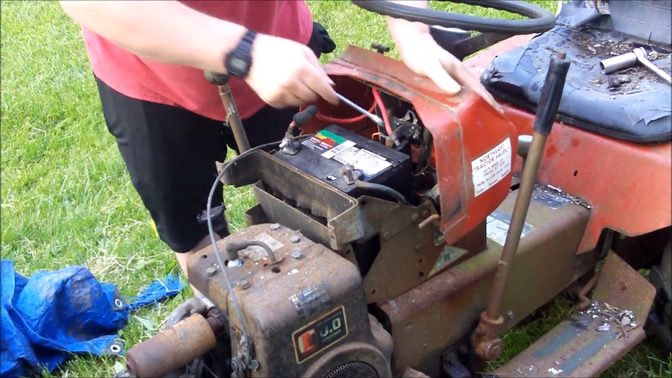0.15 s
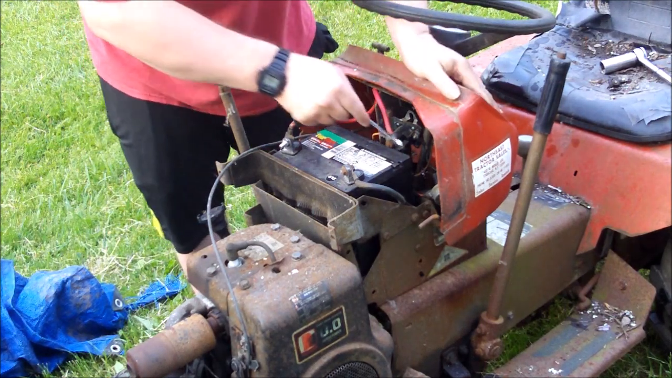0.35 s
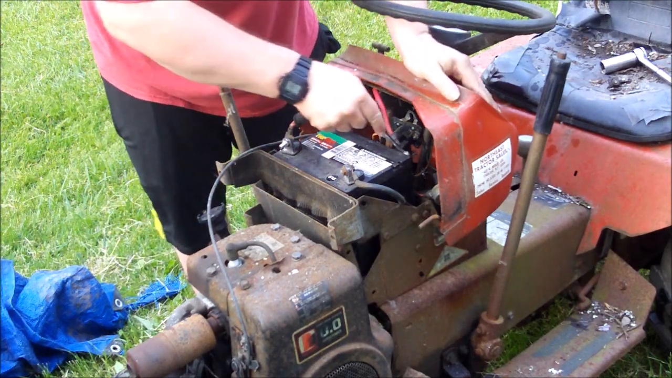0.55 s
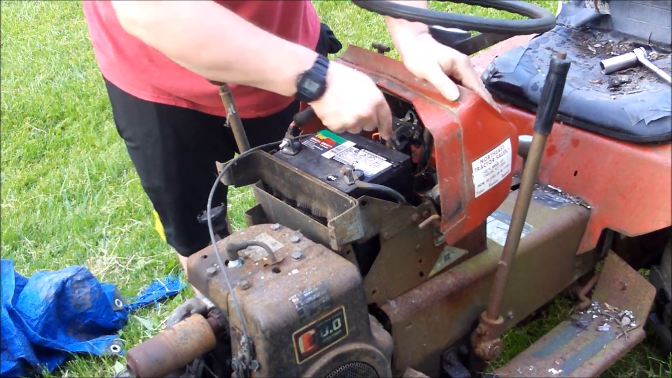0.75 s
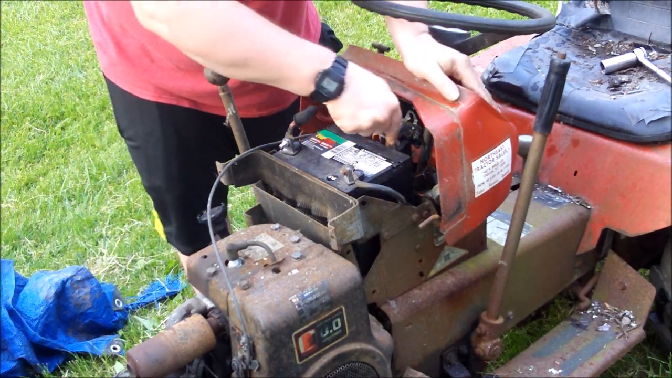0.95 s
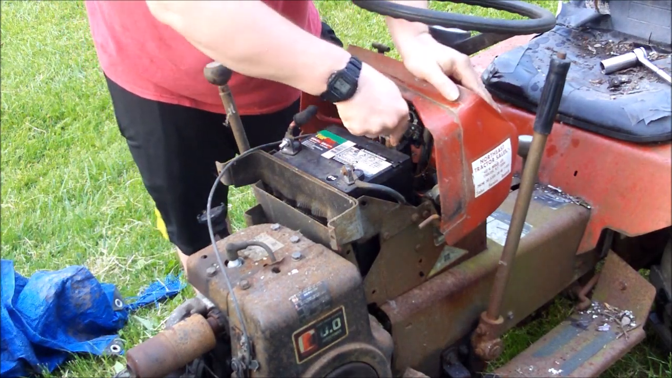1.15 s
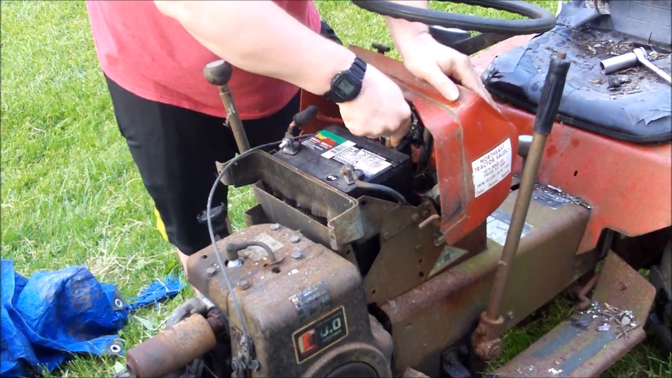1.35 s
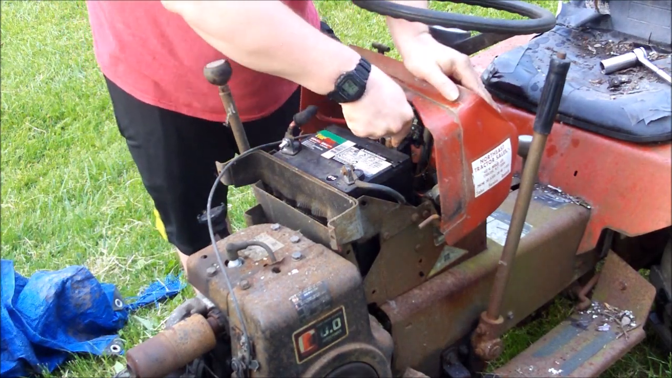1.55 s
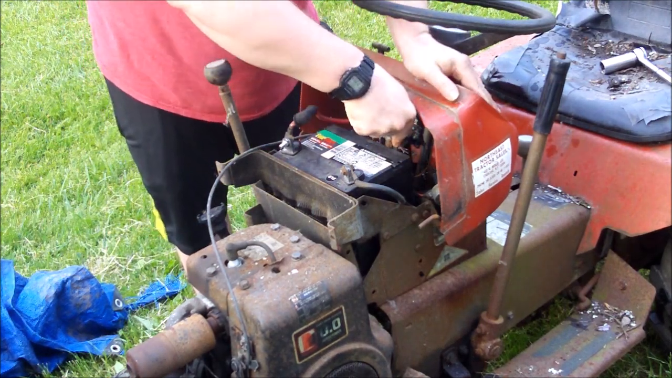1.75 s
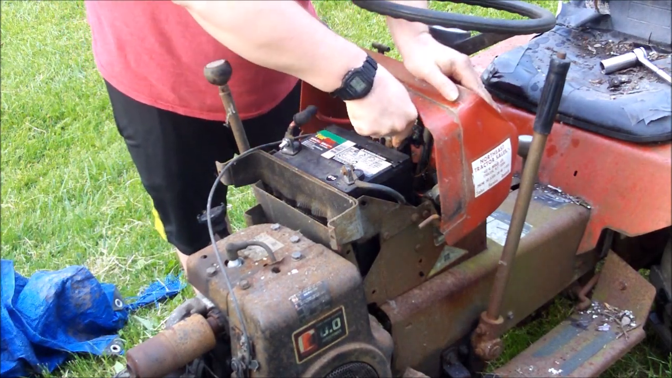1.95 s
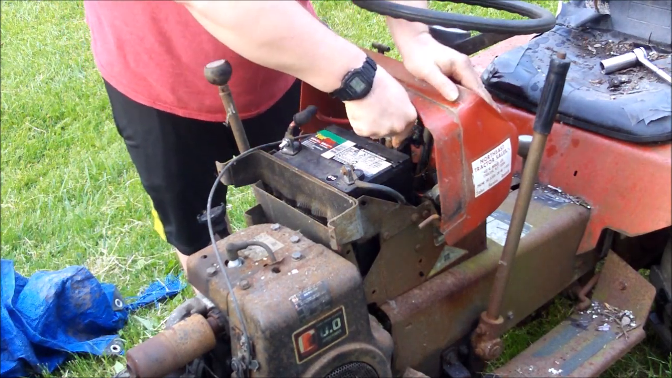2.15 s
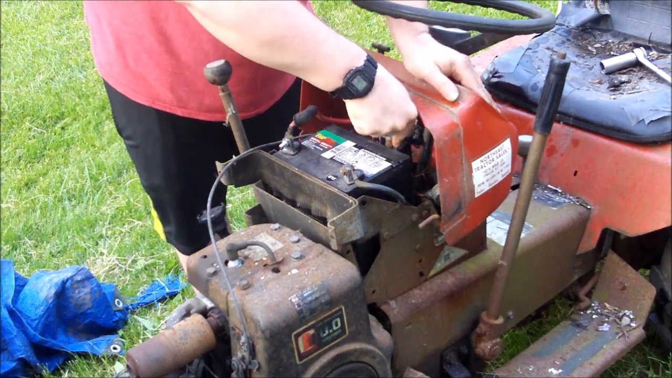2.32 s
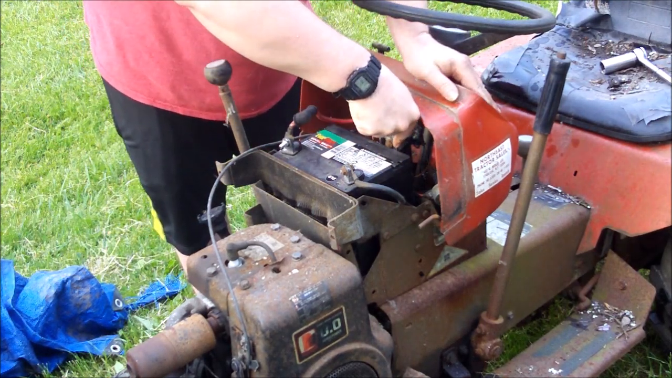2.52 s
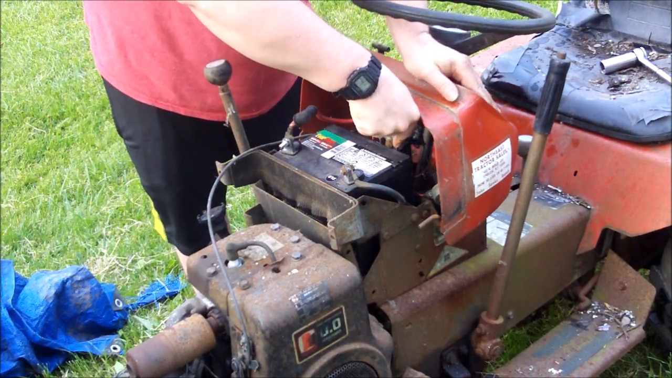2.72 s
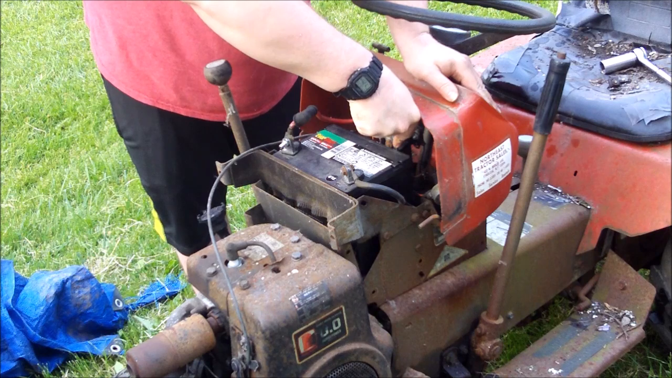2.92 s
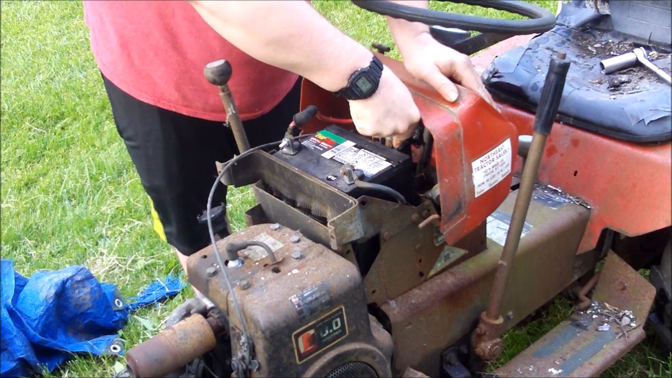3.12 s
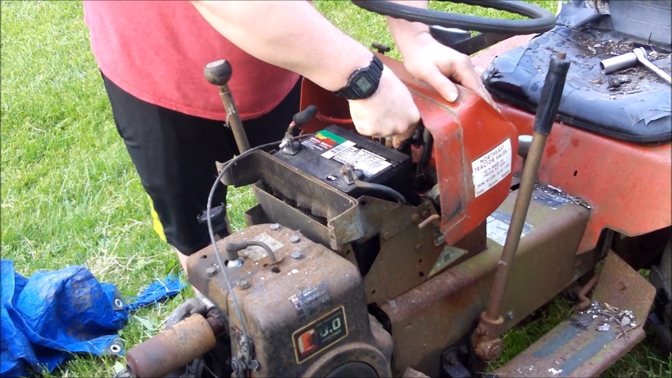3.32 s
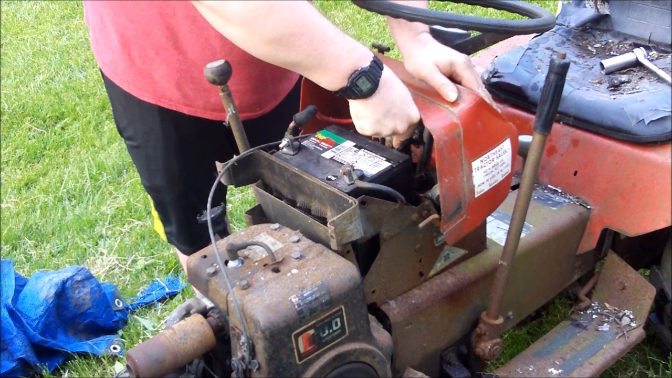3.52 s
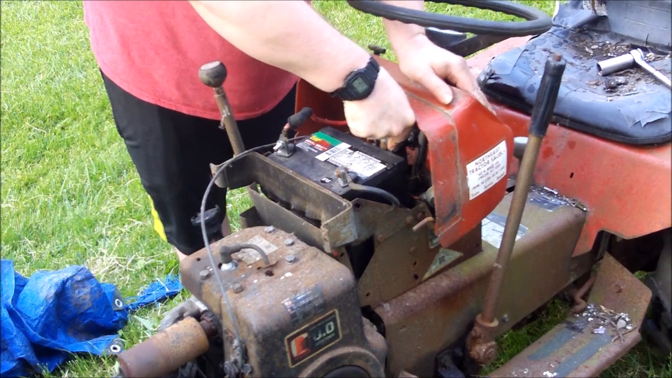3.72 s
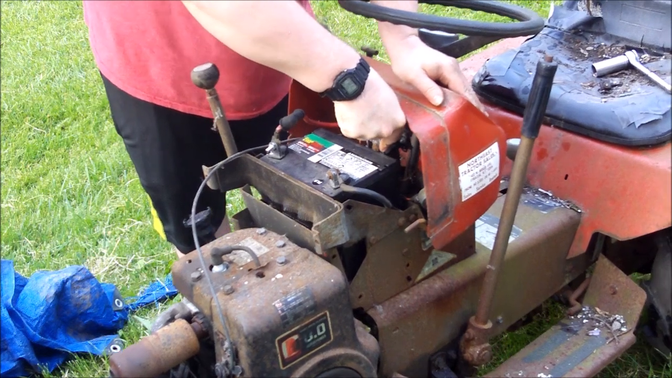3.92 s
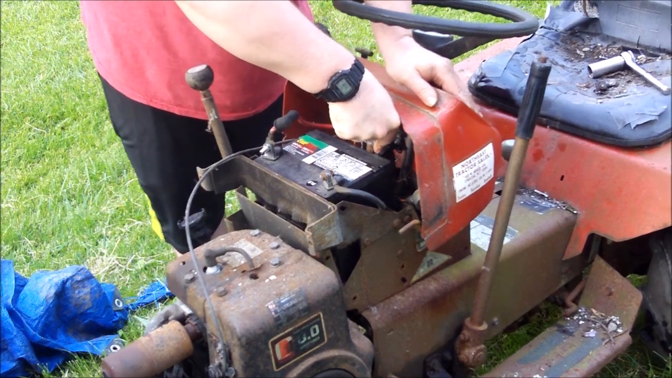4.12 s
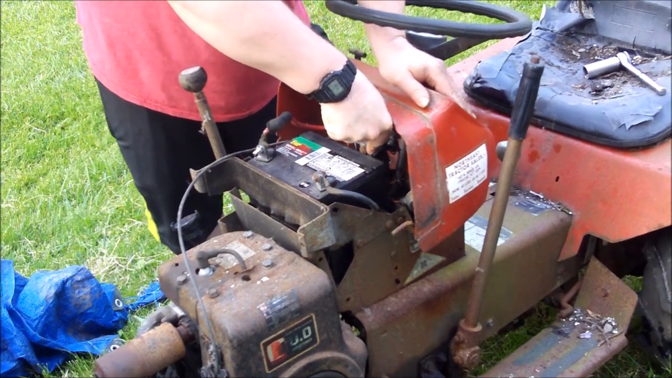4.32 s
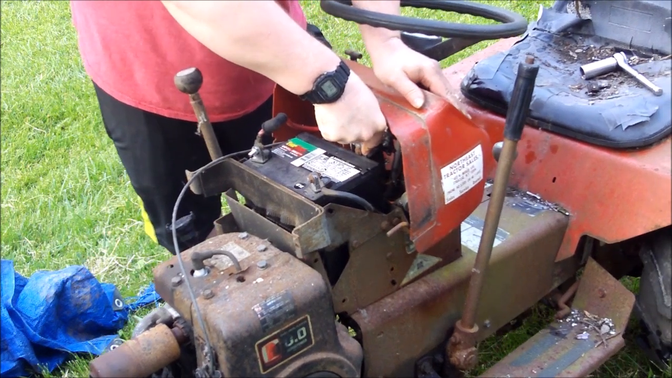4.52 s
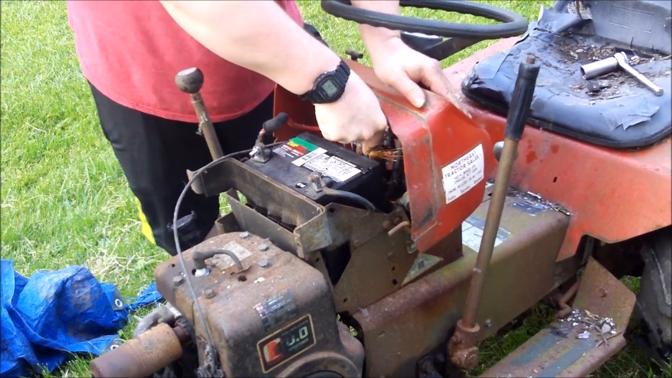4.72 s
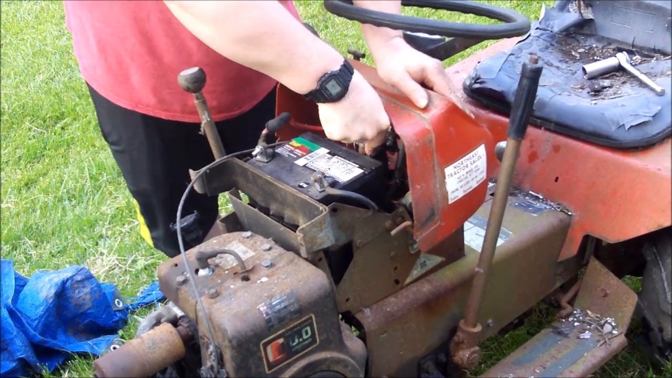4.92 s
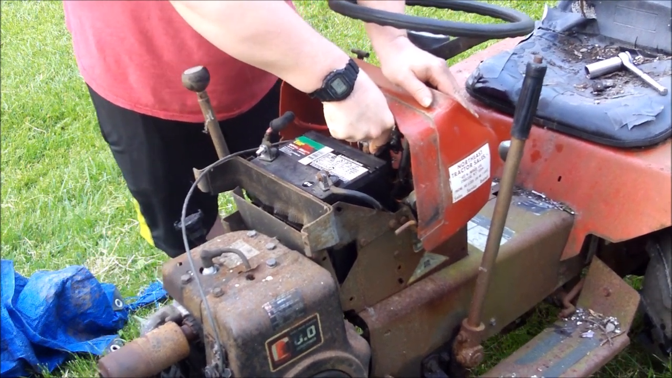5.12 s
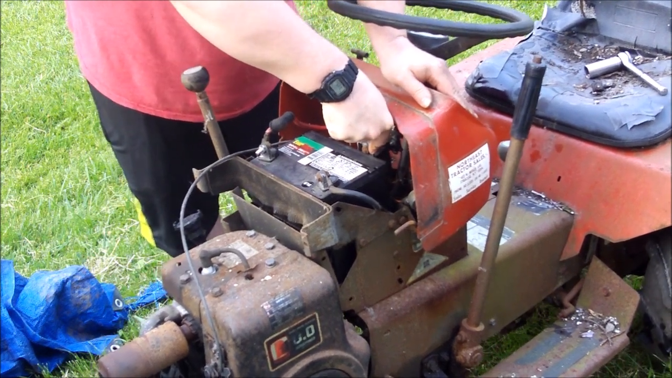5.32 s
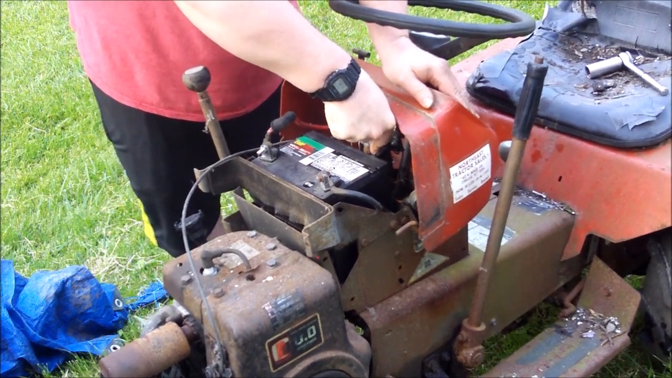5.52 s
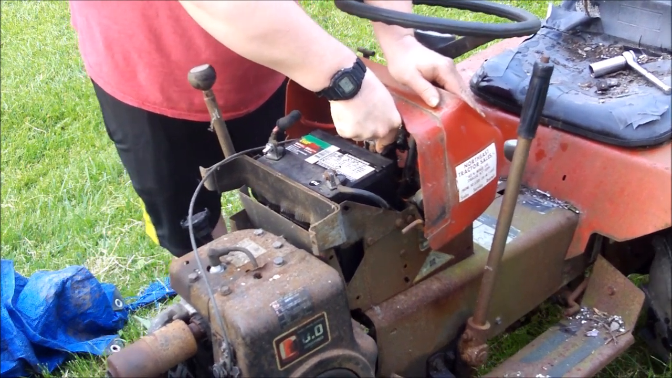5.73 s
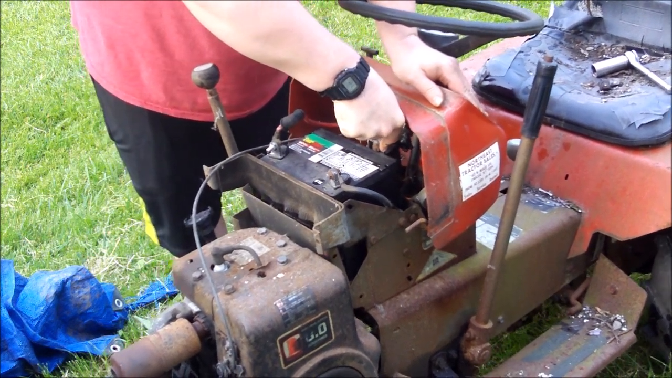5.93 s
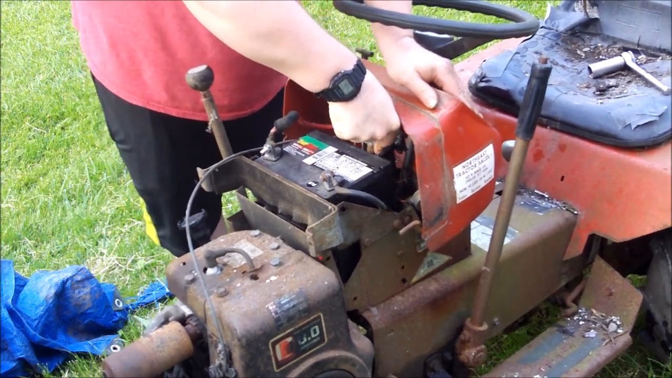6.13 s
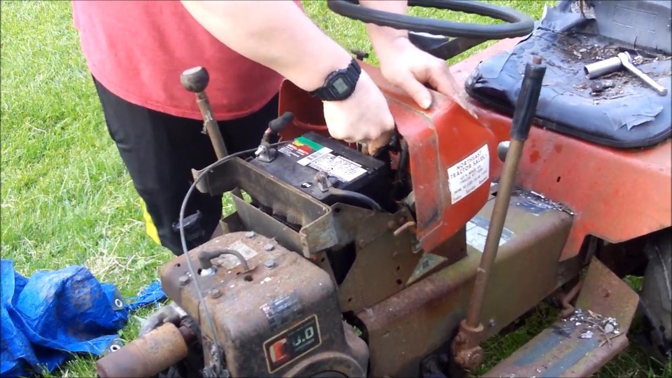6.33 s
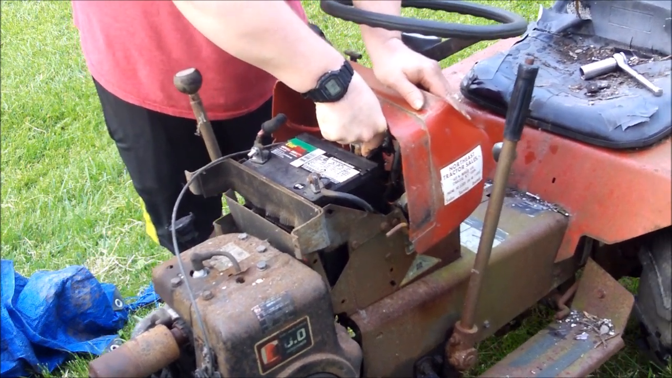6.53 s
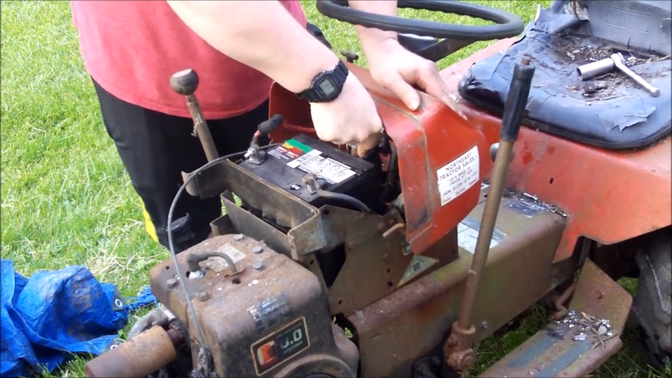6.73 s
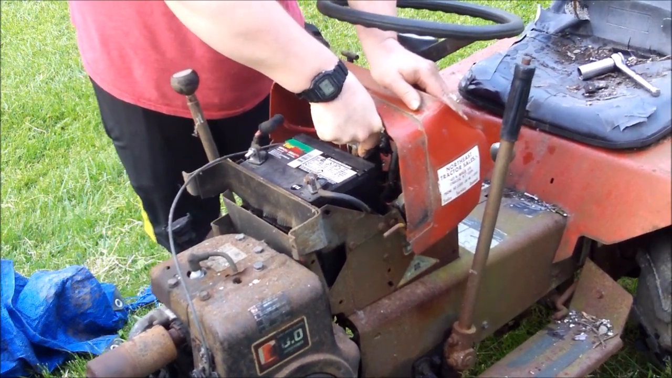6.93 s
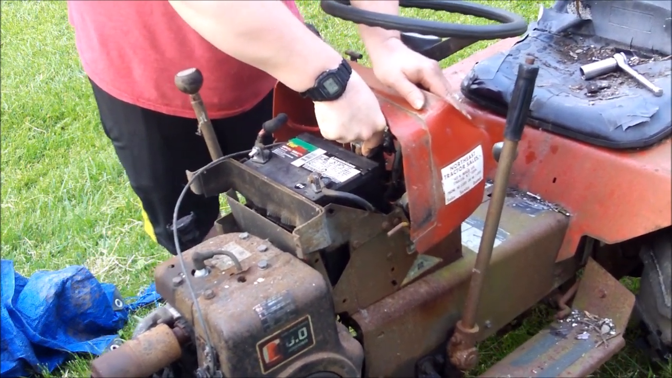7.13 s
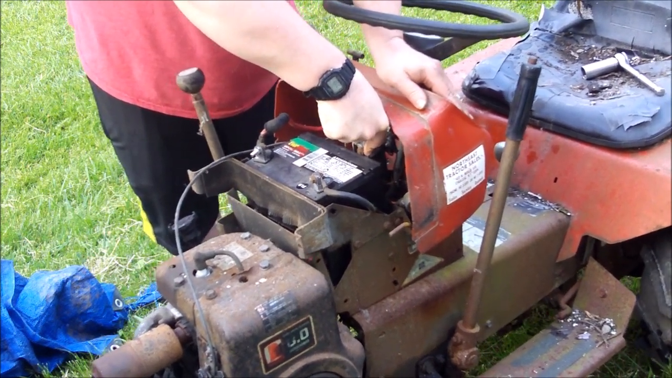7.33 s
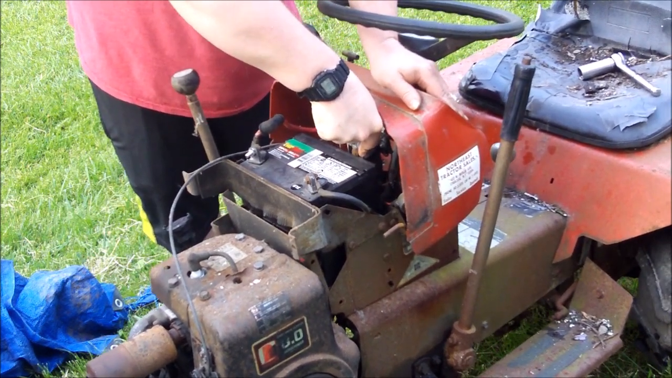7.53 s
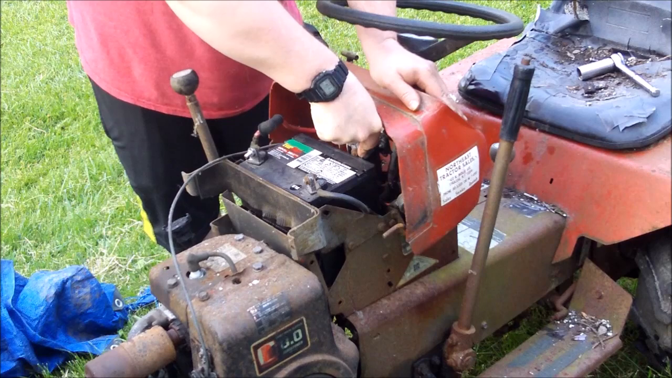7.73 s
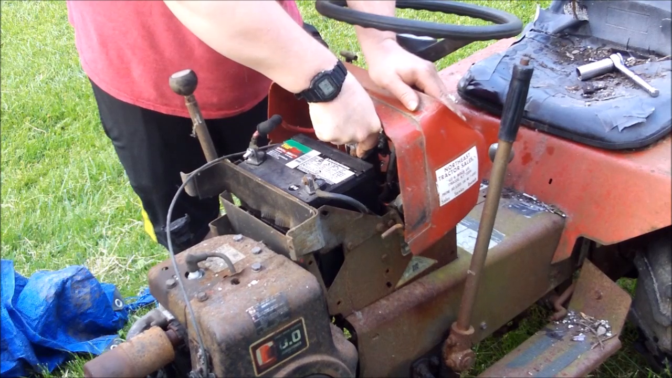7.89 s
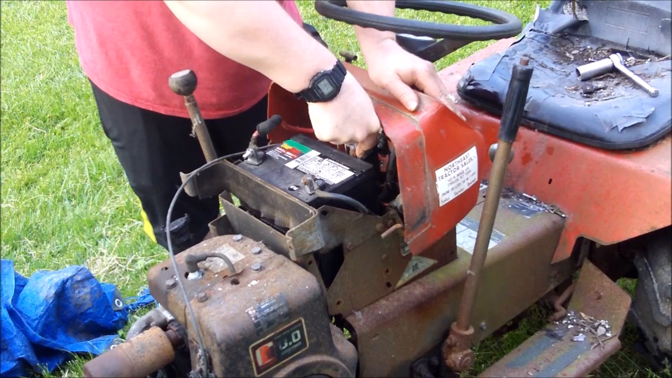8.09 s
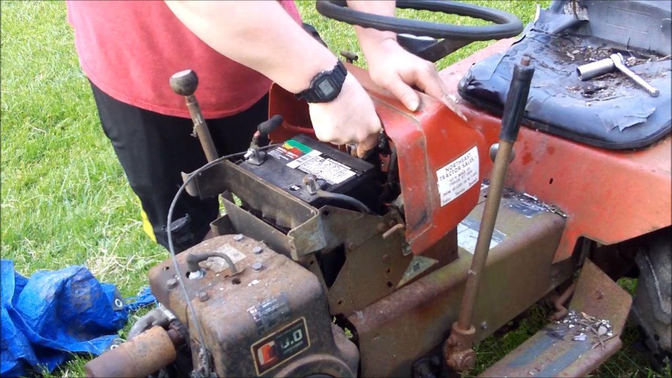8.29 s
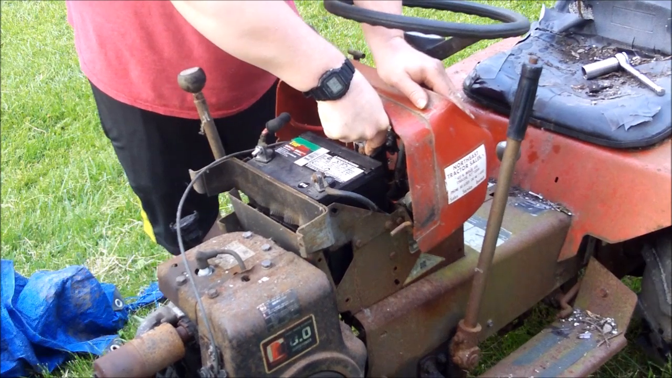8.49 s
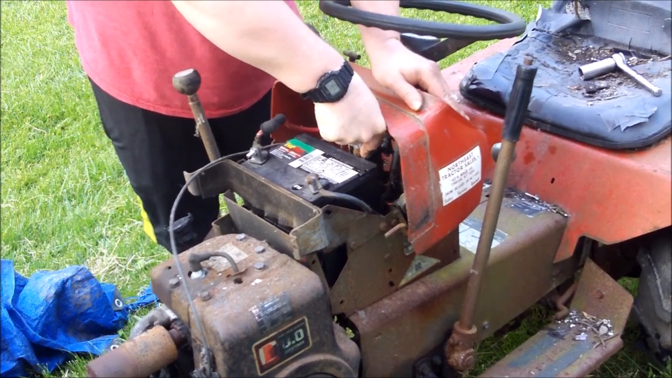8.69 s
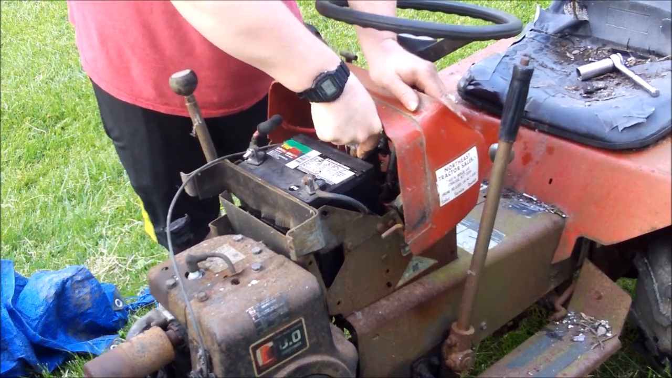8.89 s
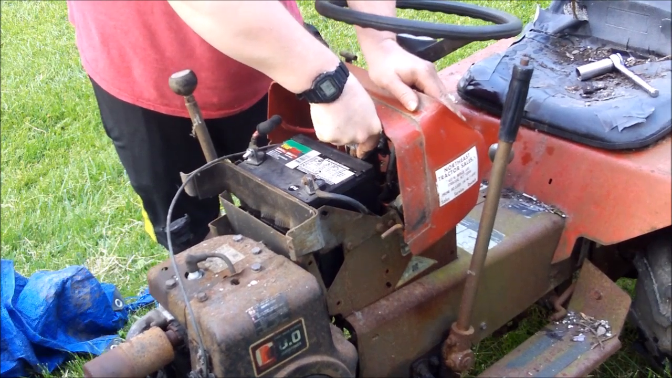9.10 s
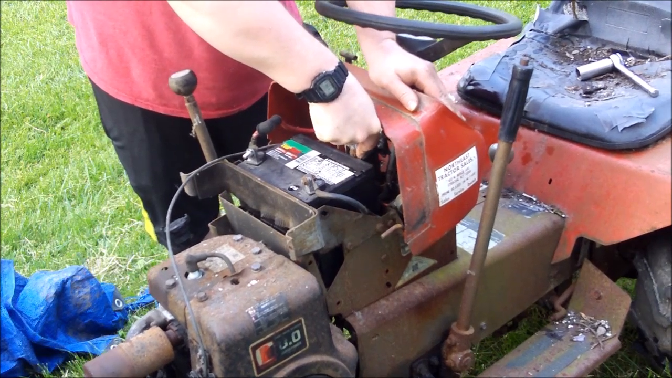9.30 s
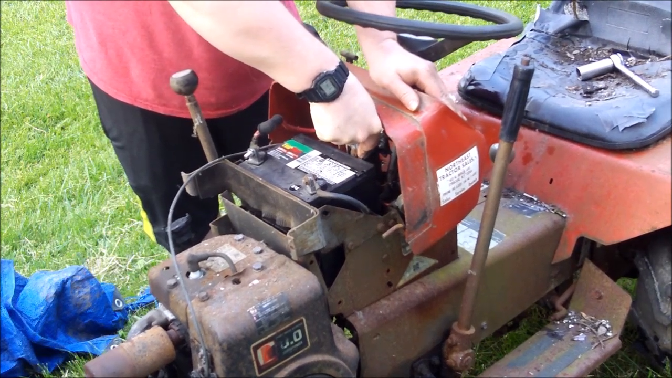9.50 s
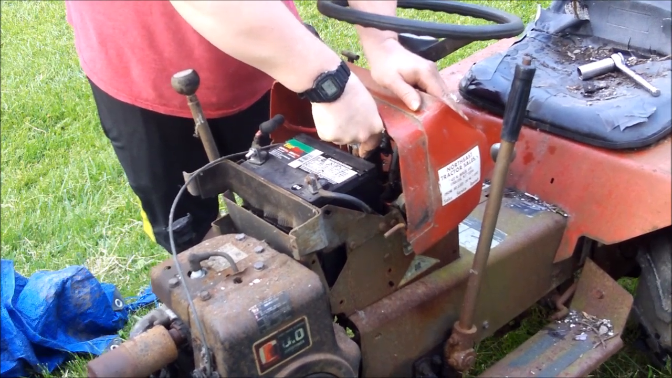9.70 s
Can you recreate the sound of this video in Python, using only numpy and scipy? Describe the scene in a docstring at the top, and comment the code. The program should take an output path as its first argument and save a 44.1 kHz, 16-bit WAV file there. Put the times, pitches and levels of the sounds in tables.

```python
"""Jump-started lawn tractor, outdoors on grass

A tool across the starter solenoid makes two short bursts, then one long crank, broken where the contact slips.
The pinion grinds over the flywheel teeth: a hail of noise blows rings resonant modes of gears and steel frame.
Sparks and clinks crackle as noise bursts; filtered noise whirs on whenever the current stops.
Behind lie garden noise, a distant wavering drone and a thin high trill, all through one mono microphone."""
import sys
import numpy as np
from scipy import signal
from scipy.fft import rfft, irfft
from scipy.io import wavfile
from scipy.ndimage import uniform_filter1d, map_coordinates

SR = 44100
rng = np.random.default_rng(int(sys.argv[2]) if len(sys.argv) > 2 else 0)


def persist_wave(psi):
    """Save psi, clipped to +-1, as 16-bit WAV."""
    counts = np.round(np.clip(psi, -1, 1) * 32767).astype(np.int16)
    wavfile.write(sys.argv[1], SR, np.atleast_2d(counts).T)


N = 429975
T = np.arange(N) / SR  # s

# distant garden noise, relative spectrum: f/Hz, density/dB
GARDEN_SPECTRUM = [(25, -33.5), (60, -18), (130, -11.5), (170, -14), (240, -6), (320, -12), (470, 1.5),
                   (620, -5.5), (900, 2), (1130, -6), (1500, -1.5), (1830, -15), (2600, -12.5), (4000, -21),
                   (6500, -22.5), (11000, -31.5), (15000, -33)]
# level of garden noise and drone: t/s, level/dB
GARDEN_LEVEL = [(0, -50.5), (.85, -49), (1.5, -48.5), (2.2, -54), (2.5, -54)]
# tones of the thin high trill: f/Hz, rms level/dB
TRILL_TONES = [(7838, -62.5), (7897, -75)]
# sparks at the terminal and clinks of the drive dropping back:
# t/s, level/dB, share that knocks the metal/0-1, length/s
TICKS = [(0.663, -44, 0.2, 0.0068), (0.968, -21, 0.15, 0.007), (1.446, -38.5, 1, 0.017),
         (1.48, -38, .03, 0.012), (1.513, -40, 0.85, 0.011), (1.648, -38, 0.3, 0.018),
         (1.939, -51, 0.3, 0.0088), (1.957, -44, .5, 0.024), (2.246, -46, 0.1, 0.0065)]
# pinion drive knocking against its stop: f/Hz, width/Hz, relative level/dB
DRIVE_MODES = [(2040, 35, 2), (2350, 180, -7), (2770, 200, -2), (3150, 120, -10), (5600, 25, -6)]
# spells of electrical contact: made t/s, broken t/s, starting surge re running level/dB,
# surge length/s, running level re steady cranking/dB
CONTACTS = [ (0.985, 1.335, 9.5, .06, -0.5), (1.669, 1.82, 9, .045, 0.5), (2.26, 4.660, 6, .05, 0),
            (4.689, 4.727, 2, .02, -2), (4.757, 4.894, 2, .03, 0), (4.923, 4.953, 6, .02, -1),
            (5.009, 5.272, 3, .02, 0.5), (5.351, 5.529, 4.5, .03, -0.5), (5.567, 5.6, -3.5, .02, 3),
            (5.65, 6.927, 2, .06, 0.5), (6.957, 9.584, 2.5, .04, 0), (9.61, 9.666, -1.5, .02, 2),
            (9.709, 9.750, -3, .02, 1.5), ]
# frame, shroud and hood: f/Hz, width/Hz, relative level/dB
FRAME_MODES = [(253.8, 6.9, -23), (362.6, 9.6, -11), (413, 4.5, -17), (448.4, 8.6, -4.5), (488.7, 9.9, 2.5),
               (567, 13, -18), (733.3, 8.2, -5.5), (908, 31, -3.5), (954.5, 22.5, -3), (1120, 160, -15),
               (1222, 37.5, -7.5), (1942, 17, -2), (2046, 61, -11)]
# dead clack between the frame modes: f/Hz, relative level/dB
FRAME_CLACK = [(100, -76), (200, -41), (320, -36), (380, -11.5), (620, -17), (800, -14.5), (1400, -13),
               (1580, -11.5), (1730, -25.5), (1860, -51), (2100, -20.5), (2600, -20.5), (3200, -44.5)]
# pinion and ring gear: f/Hz, width/Hz, relative level/dB
GEAR_MODES = [(3260, 22, -4), (3390, 24.6, 0.5), (3603, 22, -3.5), (3790, 69, -4.5), (4053, 96, -8.5),
              (4300, 26, -7.5), (4738, 12, -2), (5204, 50, -3), (5665, 27, 2), (5810, 49, -1),
              (5965, 39, -2), (6060, 32, 0.5), (6330, 12.4, -1), (6420, 90, -6.5), (6900, 41, -6.5),
              (7380, 85, -7), (8040, 46, -8.5), (7900, 43, -24), (7680, 29, -5), (8000, 17, -6),
              (8480, 42, -5.5), (8980, 50, -4.5), (9500, 140, -10), (10420, 100, -11.5), (12400, 530, -17),
              (14280, 170, -13.5)]
# dead clack between the gear modes: f/Hz, relative level/dB
GEAR_CLACK = [(2000, -56), (2600, -19.5), (3500, -14.5), (4500, -14), (6000, -18), (8000, -21),
              (11200, -18.5), (12200, -24.5), (13600, -27.5), (15100, -28.5)]
# armature spinning free: f/Hz, width/Hz, relative level/dB
COAST_MODES = [(365, 25, -9), (424, 12, -2), (824, 18, 1), (1095, 22, -3), (1410, 50, -13), (1965, 25, -9),
               (5790, 30, -13)]
# teeth snagging, a brief change of level: t/s, gear ring level/dB, frame clatter level/dB
SNAGS = [(2.342, 3.5, 3), (2.94, 0.5, 5), (3.335, 0.5, 1), (6.415, 1, -4), (7.58, 2.5, 5), (7.735, 1.5, 2),
         (8.18, 0.5, 2), (8.3, 1, 0)]
# modes that sing while the flywheel stands and the pinion rides in one place:
# f/Hz, width/Hz, relative level/dB
SQUEAL_MODES = [(3330, 20, -1), (3620, 22, 0), (3860, 50, -3), (5860, 140, -5), (7660, 25, -8),
                (8550, 18, 0), (8930, 45, -3), (10400, 65, -7), (12700, 30, -11), (13600, 30, -16),
                (14400, 30, -16)]
# how much of the blows' power the singing modes take: t/s, share/0-1
SQUEAL_SHARE = [(2.38, 0), (2.5, .45), (2.75, .55), (3.12, .45), (3.32, 0)]

TRILL_RATE, TRILL_TICK_S, TRILL_TICK_DB = 60, .0015, -70  # ticks per s, fall time, rms level
BLOWS_PER_S = 1500
# strength of the blows in steady cranking, before they ring the metal
GEAR_BLOW_DB, FRAME_BLOW_DB = -22, -24
# the frame takes this share of a surge; its clatter and the hardness sink as the battery tires
FRAME_SURGE_SHARE, FRAME_SAG_DB_PER_S, HARDNESS_SAG_DB_PER_S = 0.92, 0.1036, 0.11
# the first blows of a spell are harder; they soften as the tool eases off before a break
BITE_S, BITE_HARD_DB, BITE_HARD_S = 0.013, 4, .012
EASE_SOFT_DB, EASE_S = 3, 0.012
# uneven mesh: chance swings of each control, and changes per s
GEAR_SWING_DB, FRAME_SWING_DB, HARDNESS_SWING_DB, SWING_RATE = 1.0, 0.76, 1, 26
SNAG_S = 0.011
# fall of the blows after a break; the treble's fall is added to that of the gears
FRAME_FADE_DB_PER_S, GEAR_FADE_DB_PER_S, TREBLE_FADE_DB_PER_S = 310, 260, 170
# patches of the turning ring gear: depth, width, changes per s, upward slide
LOBE_DEPTH_DB, LOBE_WIDTH_HZ, LOBE_RATE, LOBE_SLIDE_HZ_PER_S = 2.9, 240, 58, 5000
RIM_SWAY_S, RIM_SWAY_RATE = .0001, 26  # spread of the delay before smoothing, changes per s
MIC_TOP_HZ = 15300


def undb(db):
    """Decibels to gain."""
    return 10 ** (np.asarray(db) / 20)


def unit(x):
    """Scale to an rms of 1."""
    return x / np.sqrt(np.mean(x ** 2))


def curve(rows):
    """Each column of (s, value, ..) rows at every sample."""
    s, *columns = np.transpose(rows)
    return [np.interp(T, s, c) for c in columns]


def wander(rate):
    """Smooth chance with a spread near 1, changing `rate` times a second (400 at most)."""
    return 1.2 * np.interp(T * min(rate, 400), np.arange(4096), rng.standard_normal(4096))


def fall(age, length_s):
    """Exponential fall from 1, starting at age 0."""
    return np.exp(-np.clip(age / length_s, 0, 20))


def resonate(x, hz, width):
    """One mode, gain 1 at its centre."""
    return signal.lfilter(*signal.iirpeak(hz, hz / max(width, 4), fs=SR), x + 1e-18)


def colour(x, points, size=2048):
    """Causal minimum-phase filter through (Hz, dB) points."""
    hz, db = np.transpose(points)
    bin_hz = np.arange(size // 2 + 1) * SR / size
    gain = undb(np.interp(np.log(bin_hz + 1), np.log(hz), db))
    # folding the cepstrum forward makes the filter causal
    cepstrum = irfft(np.log(gain))
    cepstrum[1:size // 2] *= 2
    cepstrum[size // 2 + 1:] = 0
    impulse = irfft(np.exp(rfft(cepstrum)))
    return signal.oaconvolve(x, impulse)[:N]


def band(x, lo_hz, hi_hz, order=4):
    """Band-pass."""
    return signal.sosfilt(signal.butter(order, [lo_hz, hi_hz], "band", fs=SR, output="sos"), x + 1e-18)


def ring(blows, modes, drift_db, drift_rate):
    """Blows ring the modes; each lands on another spot, and the mix drifts as the contact moves."""
    out, spot = 0, rng.choice([-1., 1.], N)
    for hz, width, db in modes:
        sign = np.roll(spot, rng.integers(N))
        weight = sign * undb(db + drift_db * wander(drift_rate))
        out = out + resonate(blows * weight, hz, width)
    return out


def garden():
    """Distant outdoor noise with a wavering drone; over it a steady ticking trill and a thin high whine."""
    level_db, = curve(GARDEN_LEVEL)
    air = unit(colour(rng.standard_normal(N), GARDEN_SPECTRUM, size=8192)) * undb(0.47 * wander(23))
    phase = 2 * np.pi * np.cumsum(964 + 14 * wander(90)) / SR
    drone_tones = undb(-4.0) * np.sin(phase) + undb(-12.5) * np.sin(2 * phase)
    drone = undb(1.4 * wander(20)) * drone_tones
    # the trill's pitch wavers slightly
    clock = T + np.cumsum(.0012 * wander(25)) / SR
    trill = np.sqrt(2) * sum(undb(db) * np.sin(2 * np.pi * hz * clock) for hz, db in TRILL_TONES)
    pulse = fall(T % (1 / TRILL_RATE), TRILL_TICK_S)
    trill_ticks = undb(TRILL_TICK_DB) * unit(band(pulse * rng.standard_normal(N), 7780, 7940, order=1))
    whine = undb(-86) * np.sin(2 * np.pi * 14987 * T)
    return (air + drone) * undb(level_db) + trill + trill_ticks + whine


def ticks():
    """Each spark or clink is a short crackle: one part heard directly, one that knocks the metal."""
    crackle = unit(rng.standard_normal(N) * undb(5 * wander(400)))
    direct, knocks = np.zeros(N), np.zeros(N)
    for s, db, share, length in TICKS:
        burst = crackle * (T >= s) * undb(db) * fall(T - s, length)
        direct += burst * (1 - np.clip(share, 0, 1))
        knocks += burst * np.clip(share, 0, 1)
    drive = sum(undb(db) * resonate(knocks, hz, width) for hz, width, db in DRIVE_MODES)
    return undb(5) * band(direct, 2200, 9300, order=2) + undb(18.0) * drive, knocks


def contact():
    """Each contact surges and settles: blow strengths, hardness, time since the break and pinion bite."""
    run_db, surge_db, touch_db, idle, bite = np.zeros((5, N))
    for made, broken, start_db, surge_s, steady_db in CONTACTS:
        # each spell holds until the next one overwrites it
        after = slice(np.searchsorted(T, made), None)
        age, left = T[after] - made, broken - T[after]
        run_db[after] = steady_db
        surge_db[after] = start_db * np.exp(-np.minimum(age / surge_s, 10) ** 2)
        touch_db[after] = BITE_HARD_DB * fall(age, BITE_HARD_S) - EASE_SOFT_DB * fall(left, EASE_S)
        idle[after] = np.maximum(-left, 0)
        bite[after] = np.interp(age, [0, BITE_S], [.4, 1])
    snag_gear_db, snag_frame_db = snags()
    gear_db = GEAR_BLOW_DB + run_db + surge_db + snag_gear_db + GEAR_SWING_DB * wander(SWING_RATE)
    frame_db = (FRAME_BLOW_DB + run_db + FRAME_SURGE_SHARE * surge_db + snag_frame_db
                - FRAME_SAG_DB_PER_S * T + FRAME_SWING_DB * wander(SWING_RATE))
    hardness_db = touch_db - HARDNESS_SAG_DB_PER_S * T + HARDNESS_SWING_DB * wander(SWING_RATE)
    return gear_db, frame_db, hardness_db, idle, bite


def jolts():
    """The starter's torque rocks the tractor as each of the three runs begins: a decaying 42 Hz sine."""
    ages = [np.maximum(T - made, 0) for made, *_ in CONTACTS[:3]]
    return undb(-53) * sum(np.sin(2 * np.pi * 42 * age) * np.exp(-age / .018) for age in ages)


def tooth_blows():
    """The pinion skips over the teeth: dense blows at chance times, in chattering bunches, plus scrape."""
    hit = rng.random(N) < BLOWS_PER_S / SR
    blows = unit(hit * rng.choice([-1., 1.], N))
    scrape = undb(-5.5) * rng.standard_normal(N)
    return unit((blows + scrape) * undb(0.28 * wander(380)))


def frame(push):
    """The blows shake shroud and frame: a hollow clatter from panels too small to radiate bass."""
    modes = ring(push, FRAME_MODES, drift_db=0.5, drift_rate=14)
    clatter = colour(push, FRAME_CLACK) + undb(0.92) * modes
    return band(clatter, 160, 6900, order=4) * undb(19.0)


def harden(push, hardness_db):
    """Harder blows carry more top treble."""
    soft = signal.sosfiltfilt(signal.butter(3, 7000, fs=SR, output="sos"), push + 1e-18)
    return soft + (push - soft) * undb(np.minimum(hardness_db, 6.5))


def bend(x, turning):
    """The ringing rim swings towards the ear and away, so its pitches slide a little."""
    sway = uniform_filter1d(wander(RIM_SWAY_RATE), SR // RIM_SWAY_RATE)
    delay = RIM_SWAY_S * turning * sway
    return map_coordinates(x, [(T - delay) * SR], order=3)


def lobes(x, depth_db, size=512):
    """The turning ring gear beams each pitch its own way: bright patches flash past and slide upwards."""
    hz, s, spectrum = signal.stft(x, SR, nperseg=size, noverlap=size * 3 // 4)
    sliding_hz = hz[:, None] - LOBE_SLIDE_HZ_PER_S * s
    place = np.broadcast_arrays(sliding_hz / LOBE_WIDTH_HZ, s * LOBE_RATE)
    pattern = map_coordinates(rng.standard_normal((size, size)), place, order=2, mode="grid-wrap")
    gain = undb(pattern * np.interp(s, T, depth_db))
    return signal.istft(spectrum * gain, SR, nperseg=size, noverlap=size * 3 // 4)[1][:N]


def gears(push):
    """The gear teeth screech: singing modes while the flywheel stands, a flickering rasp as it turns."""
    share, = curve(SQUEAL_SHARE)
    turning = 1 - share / share.max()
    modes = ring(push * np.sqrt(1 - share), GEAR_MODES, drift_db=1.58, drift_rate=42)
    screech = bend(modes, turning) * undb(-1.5)
    clack = colour(push * (1 - .5 * share), GEAR_CLACK)
    rasp = lobes(screech + clack, LOBE_DEPTH_DB * turning)
    squeal = ring(push * np.sqrt(share), SQUEAL_MODES, drift_db=2.0, drift_rate=12) * undb(5)
    # parts this small radiate no bass
    bassless = signal.butter(2, 900, "high", fs=SR, output="sos")
    return signal.sosfilt(bassless, rasp + squeal) * undb(16.0)


def coasting(idle):
    """Once the current stops the armature whirs on and runs down; a hum near 427 Hz fades slowest."""
    whir = unit(ring(rng.standard_normal(N), COAST_MODES, drift_db=6.5, drift_rate=9.2))
    hum = unit(band(rng.standard_normal(N), 412, 442, order=2))
    running_down = undb(-37 - 52 * idle) * whir + undb(-53 - 12 * idle) * hum
    return band((idle > 0) * running_down, 250, 7000, order=2)


def snags():
    """The teeth snag for a moment: the dB each adds to the gear ring and to the frame clatter."""
    total_db = np.zeros((2, N))
    for s, gear_db, frame_db in SNAGS:
        swell = np.exp(-np.minimum(abs(T - s) / SNAG_S, 10) ** 2)
        total_db += np.outer([gear_db, frame_db], swell)
    return total_db


def scene():
    """Blows drive frame and gears; when the contact breaks they fade and soften, the treble first."""
    background = garden()
    sparks, knocks = ticks()
    gear_db, frame_db, hardness_db, idle, bite = contact()
    blows = tooth_blows() * bite
    frame_push = blows * undb(frame_db - FRAME_FADE_DB_PER_S * idle)
    clatter = frame(frame_push + undb(7.0) * knocks)
    gear_push = blows * undb(gear_db - GEAR_FADE_DB_PER_S * idle)
    hard_push = harden(gear_push, hardness_db - TREBLE_FADE_DB_PER_S * idle)
    screech = gears(hard_push + undb(-8.5) * knocks)
    return (background + sparks + jolts() + clatter + screech + coasting(idle))[None]


def record(dry):
    """The microphone loses the deep bass, rounds the highest peaks and cuts the top."""
    thin = signal.sosfilt(signal.butter(1, 30, "high", fs=SR, output="sos"), dry)
    rounded = thin / (1 + (thin / .85) ** 6) ** (1 / 6)
    return signal.sosfilt(signal.ellip(12, .2, 70, MIC_TOP_HZ, fs=SR, output="sos"), rounded)


dry = scene()
out = record(dry)
persist_wave(out)
```